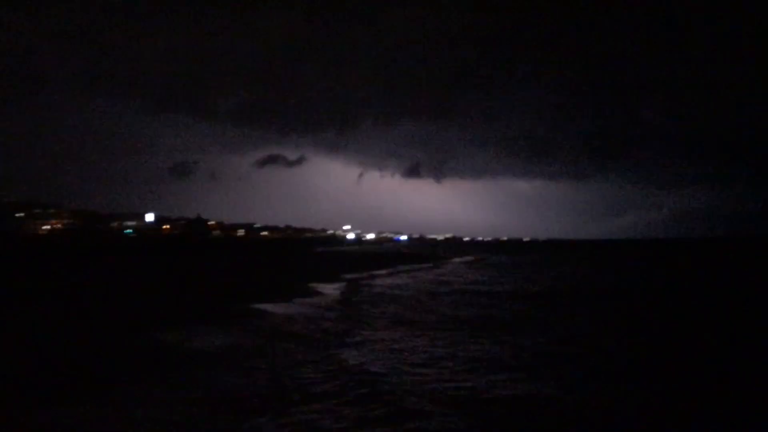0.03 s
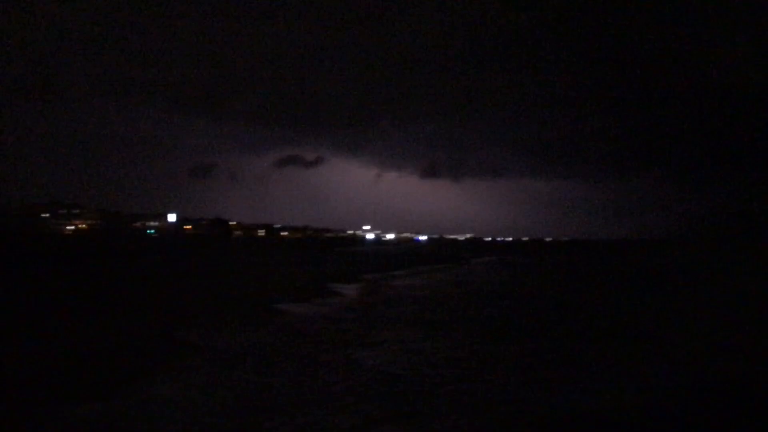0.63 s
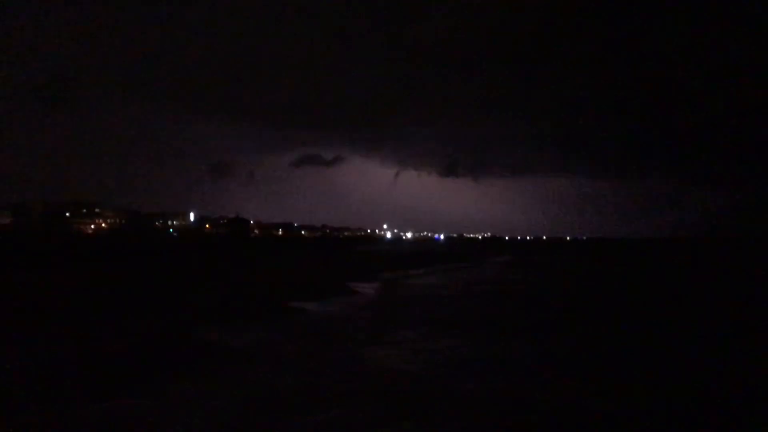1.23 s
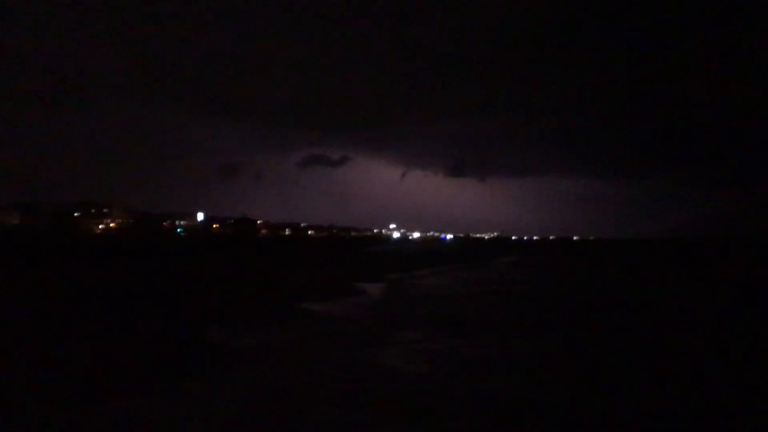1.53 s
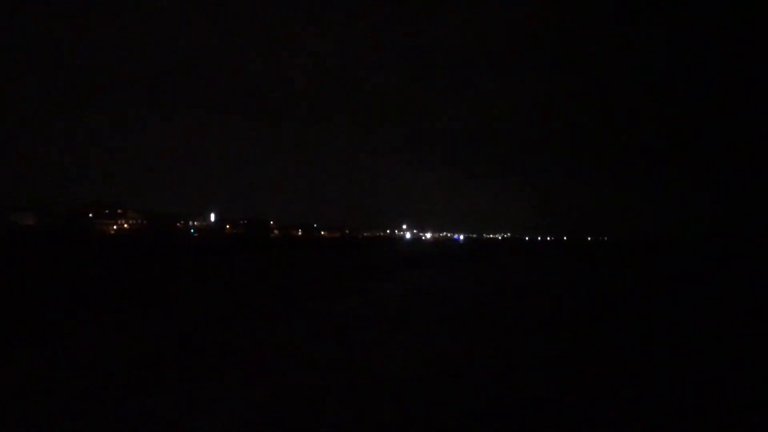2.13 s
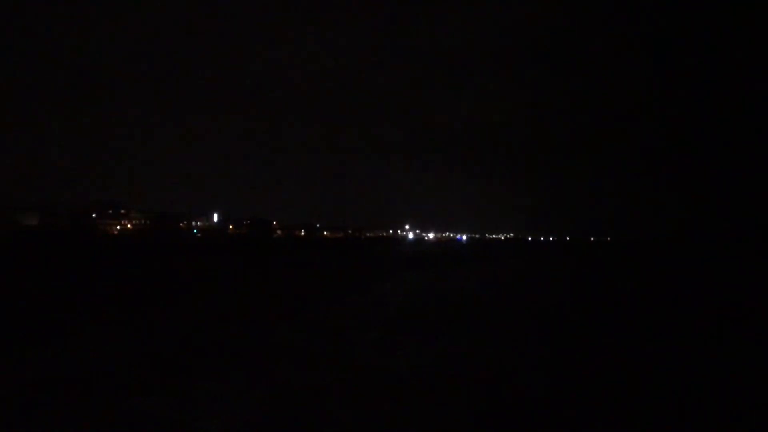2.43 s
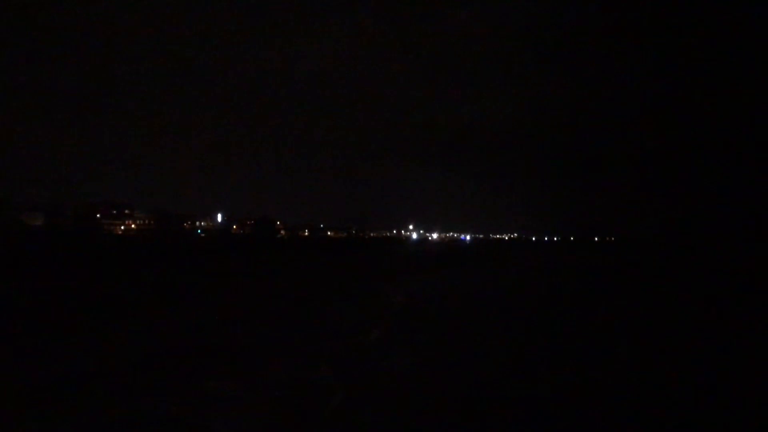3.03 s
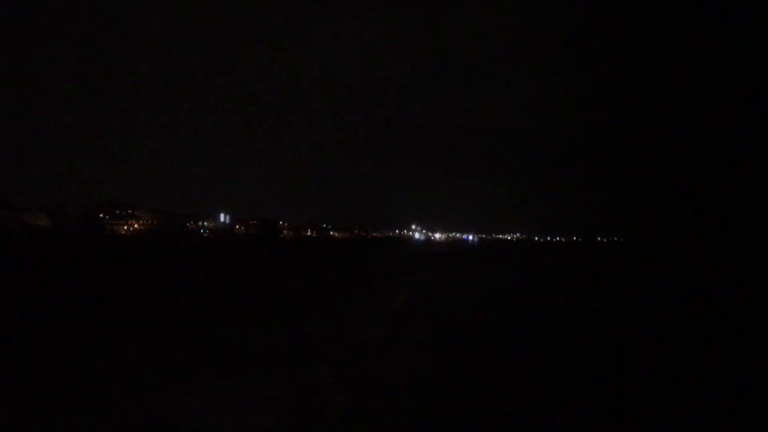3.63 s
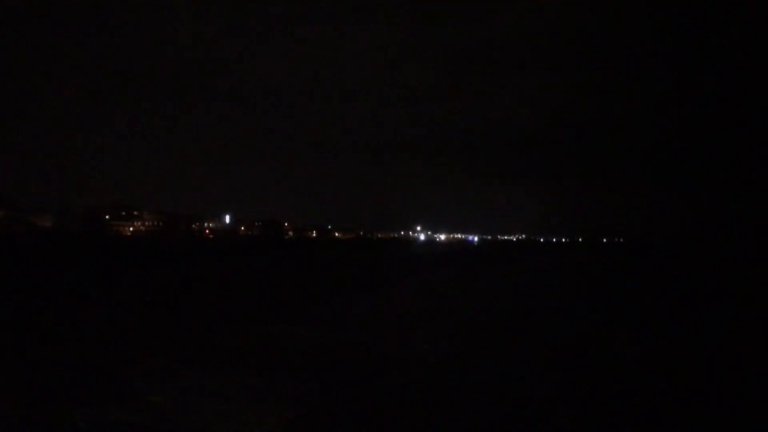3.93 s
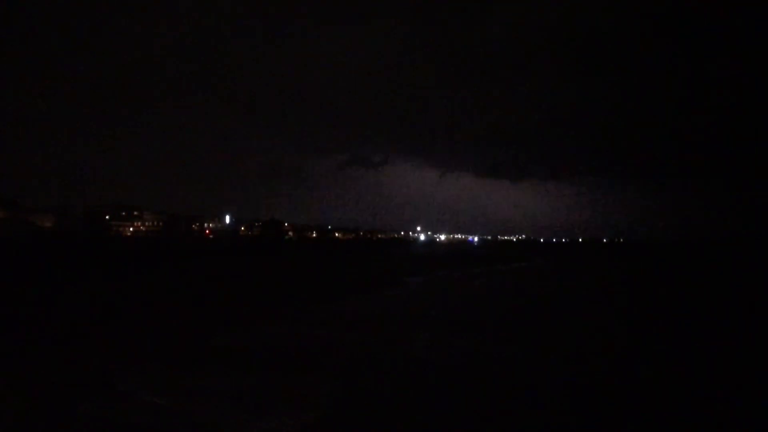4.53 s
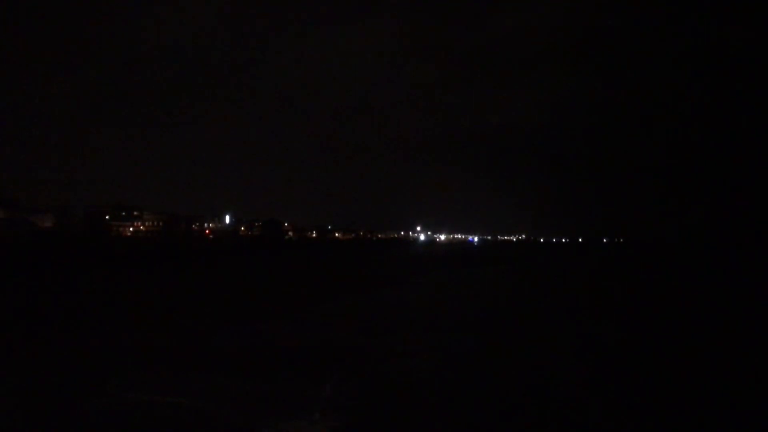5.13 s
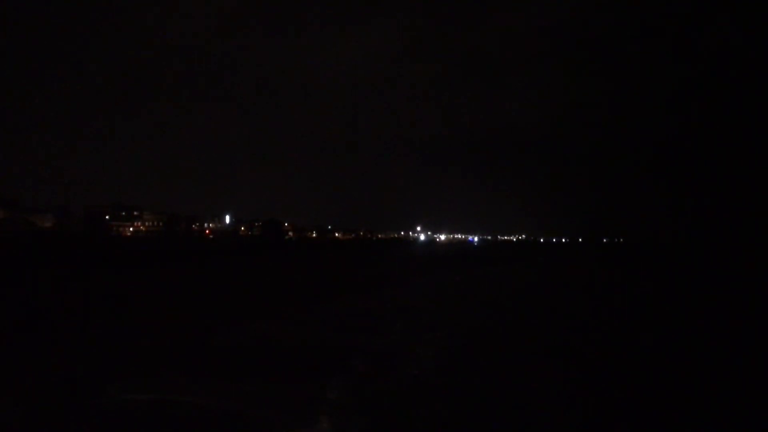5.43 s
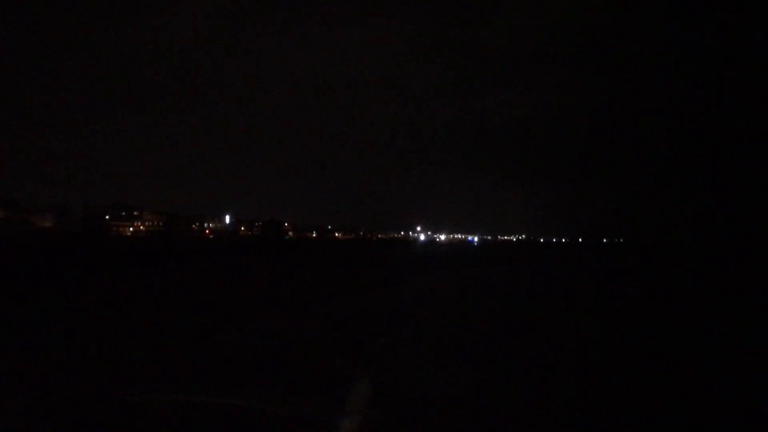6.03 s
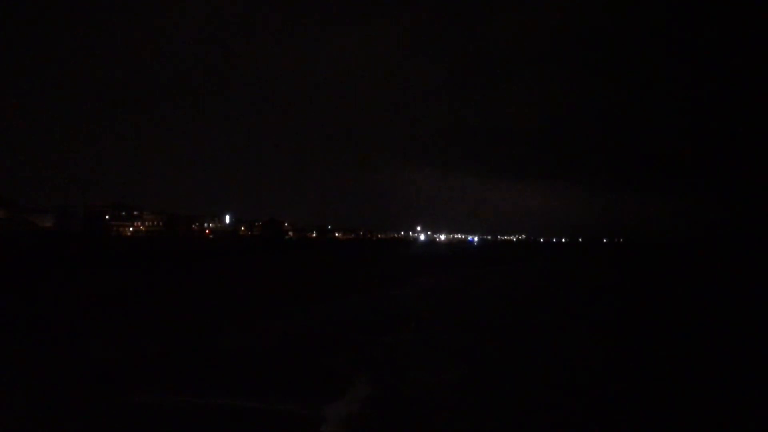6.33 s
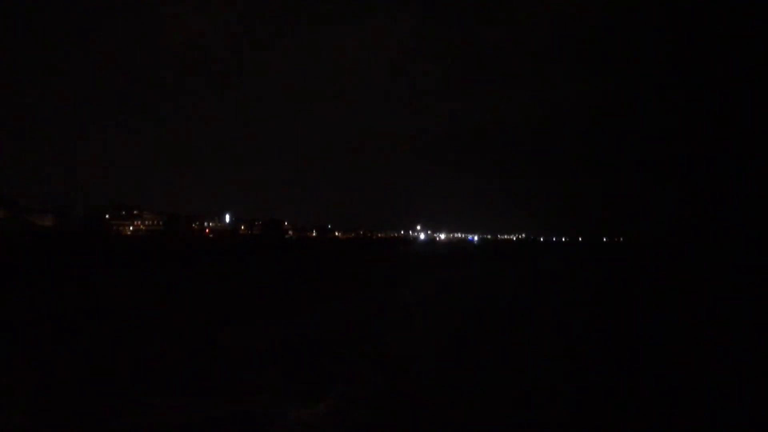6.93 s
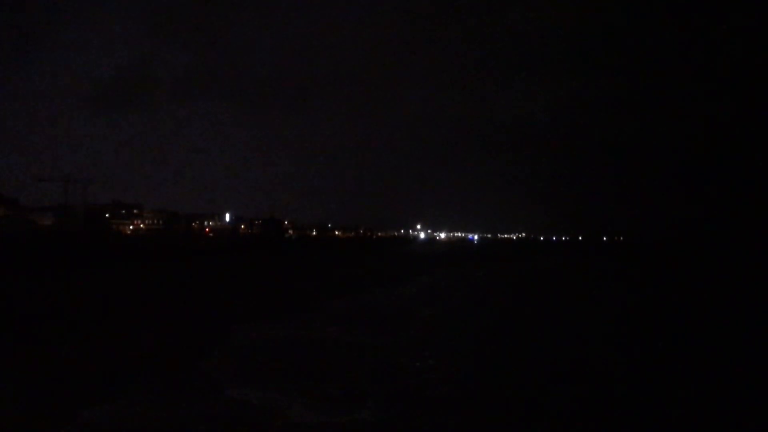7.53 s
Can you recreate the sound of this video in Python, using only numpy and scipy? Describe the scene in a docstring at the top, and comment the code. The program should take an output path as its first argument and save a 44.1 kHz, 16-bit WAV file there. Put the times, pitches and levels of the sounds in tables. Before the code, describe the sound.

Deep gusts of wind buffet the microphone from the start, loudest in the first half second, over a dull, muffled wash of distant surf. Around 0.7 seconds come three quick, hollow knocks on the microphone's case, and a few faint ticks follow up to about 3 seconds. Strong gusts thump again near 2.4 and 3.2 seconds. Between 3.5 and 4 seconds the wind eases and the sound opens up, becoming clear and bright. At about 4.5 seconds one wave breaks and runs up the beach, quieter than the gusts, with tumbling water, bubbles and hissing foam. Small drops of spray tick around 5.5 seconds and there is a soft gulp of water near 6.2. The wash swells near 6.8 seconds and then drains away, as the wind returns from 7 seconds, rumbling and buffeting until the end at about 8.

```python
"""A night shore in gusty wind. At first the sea is a muffled wash under deep buffeting of the microphone,
with a few knocks and faint ticks. Then the sound opens up: one wave breaks and runs up the beach,
and as it drains the wind catches the microphone again. Wind is low noise swelled by gusts;
the wave is noise in three bands (tumble, roar, foam hiss) with ringing air bubbles and spray."""
import sys
import numpy as np
from scipy import signal
from scipy.fft import rfft, irfft
from scipy.io import wavfile
from scipy.ndimage import uniform_filter1d

SR = 44100
rng = np.random.default_rng(int(sys.argv[2]) if len(sys.argv) > 2 else 0)


def master_out(mix):
    """Clip the mix to full scale and print it as 16-bit PCM to the path in sys.argv[1]."""
    frames = np.transpose(np.atleast_2d(mix))
    ceiling = np.clip(frames, -1, 1)
    pcm = np.round(ceiling * 32767).astype(np.int16)
    wavfile.write(sys.argv[1], SR, pcm)


N = 343098
TIME = np.arange(N) / SR


def amp(db):
    """Decibels to gain."""
    return 10 ** (np.asarray(db) / 20)


def unit_rms(x):
    """Scales to rms 1."""
    return x / np.sqrt(np.mean(x ** 2) + 1e-20)


def spectrum_gain(spectrum, hz):
    """Gain at hz, interpolated in dB over log frequency."""
    points_hz, db = np.transpose(spectrum)
    return amp(np.interp(np.log(hz + 1), np.log(points_hz + 1), db))


def add(mix, start_s, sound):
    """Mixes a sound in at start_s."""
    part = mix[max(round(start_s * SR), 0):][:len(sound)]
    part += sound[:len(part)]


def low_pass(x, hz):
    """Steep cut above hz."""
    return signal.oaconvolve(x, signal.firwin(1023, hz, window=("kaiser", 9), fs=SR), "same")


def noise(spectrum):
    """Steady shaped noise, rms 1."""
    gain = spectrum_gain(spectrum, np.fft.rfftfreq(N, 1 / SR))
    return unit_rms(irfft(rfft(rng.standard_normal(N)) * gain, N))


def turbulence(spectrum, span_samples):
    """Noise levelled over short spans, so the gusts alone shape it."""
    x = noise(spectrum)
    power = uniform_filter1d(uniform_filter1d(x ** 2, span_samples), span_samples)
    return unit_rms(x / np.sqrt(power + 0.024))


def patches(shape, frames, bins):
    """Smooth random time-frequency field, rms 1."""
    field = uniform_filter1d(rng.standard_normal(shape), frames, axis=0)
    return unit_rms(uniform_filter1d(field, bins, axis=1))


def bursts(rows, width_octaves):
    """Band-noise puffs: fast attack, slower decay."""
    out, hz = np.zeros(N), np.fft.rfftfreq(16384, 1 / SR)
    for start_s, rms_db, length_s, centre_hz in rows:
        band = np.exp(-.5 * (np.log2((hz + 1) / centre_hz) / width_octaves) ** 2)
        puff = irfft(rfft(rng.standard_normal(16384)) * band)[:int(length_s * SR)]
        u = np.linspace(0, 1, len(puff))
        add(out, start_s, amp(rms_db) * unit_rms(puff * np.sqrt(u) * (1 - u) ** 2))
    return out


def swells(rows, base_db, rise_share=0.47, drop_db=11, roundness=2.6):
    """Level in dB per part: base plus rounded swells, each length taken drop_db below its crest."""
    powers = [amp(db) ** 2 + np.zeros(N) for db in base_db]
    for crest_s, length_s, *crest_db in rows:
        near = abs(TIME - crest_s) < 2 * length_s
        u = (TIME[near] - crest_s) / length_s
        shape = amp(-drop_db * np.maximum(-u / rise_share, u / (1 - rise_share)) ** roundness)
        for power, db in zip(powers, crest_db):
            power[near] += (amp(db) * shape) ** 2
    return 10 * np.log10(powers)


# Distant surf: (time [s], level [dB])
FAR_SEA_LEVEL = [(0, -46), (1.6, -48), (2.7, -47.5), (3.4, -45)]
# Distant surf: (frequency [Hz], relative level [dB])
FAR_SEA_SPECTRUM = [(40, -2.5), (120, 6), (220, -1.5), (400, -4.5), (520, -7.5), (630, -9.5), (780, -11.5),
                    (1100, -15.5), (1300, -19), (1500, -17.5), (1900, -19.5), (2100, -27), (2300, -25.5)]
def far_sea(flicker_db=0.7):
    """Even, dull wash of surf along the shore."""
    level_db = np.interp(TIME, *np.transpose(FAR_SEA_LEVEL))
    flicker = unit_rms(uniform_filter1d(rng.standard_normal(N), 500))
    return amp(level_db + flicker_db * flicker) * noise(FAR_SEA_SPECTRUM)


# Spent foam: (frequency [Hz], relative level [dB])
FIZZ_SPECTRUM = [(500, -4.5), (3000, -2), (9000, 6), (15700, 5)]
def fizz(level_db=-61):
    """Fine, steady hiss of spent foam."""
    return amp(level_db) * noise(FIZZ_SPECTRUM)


# Ticks: (time [s], rms [dB], length [s], centre [Hz])
TICK_BURSTS = [(.801, -54, 0.029, 1340), (1.756, -52.5, 0.0066, 1030), (1.94, -56.5, 0.009, 1400),
               (2.81, -56, 0.013, 720), (3.244, -58.5, 0.0084, 1600)]
def ticks():
    """Faint midrange ticks."""
    return bursts(TICK_BURSTS, width_octaves=0.42)


# Knocks on the case: (time [s], level [dB], click gain [ratio])
CASE_KNOCKS = [(0.6645, -30, 0.07), (0.7568, -21.5, 0.17), (0.7785, -29, 0.16)]
# Case resonances: (frequency [Hz], gain [dB], t60 [s])
CASE_MODES = [(682, 5, 0.017), (543, -6, 0.023), (920, -16.5, 0.021)]
def knocks(click_hz=1800, click_decay_s=0.0014, attack_s=0.0017):
    """A click and the brief, hollow ring of the camera's case."""
    out, t = np.zeros(N), np.arange(SR // 10) / SR
    ring = sum(amp(db - 60 * t / t60_s) * np.sin(2 * np.pi * hz * t) for hz, db, t60_s in CASE_MODES)
    ring *= 1 - np.exp(-t / attack_s)
    click = np.sin(2 * np.pi * click_hz * t) * np.exp(-t / click_decay_s)
    for start_s, level_db, click_gain in CASE_KNOCKS:
        add(out, start_s, amp(level_db) * (ring + click_gain * click))
    return out


# Flurries: (time [s], rms [dB], length [s], centre [Hz])
FLURRY_BURSTS = [(4.76, -38, 0.04, 288), (5.33, -40.5, 0.029, 242), (7.147, -39.5, 0.018, 317),
                 (7.467, -37.5, 0.097, 400)]
def flurries():
    """Bursts of rougher air or slapping water."""
    return bursts(FLURRY_BURSTS, width_octaves=0.57)


# Gusts on the microphone: (crest time [s], length [s], swings [dB], eddies [dB])
WIND_GUSTS = [(.02, 0.084, -31.5, -14), (.13, 0.27, -13.5, -32), (.27, 0.16, -17.5, -25),
              (.38, 0.12, -20, -22.5), (.52, 0.15, -16, -30), (.635, 0.1, -23, -17.5),
              (.76, 0.21, -22.5, -24.5), (1.01, 0.17, -26.5, -30), (1.12, 0.062, -29, -27),
              (1.24, 0.24, -25.5, -44.5), (1.41, 0.24, -23, -35.5), (1.68, 0.25, -26.5, -59),
              (1.83, 0.12, -32.5, -49), (2.285, .06, -31, -42), (2.385, 0.11, -15, -31.5),
              (2.48, .13, -21, -36.5), (2.62, 0.15, -22, -40), (3.09, 0.09, -21, -42),
              (3.2, 0.31, -19, -40), (3.48, 0.34, -39.5, -61), (3.86, .16, -41, -58),
              (4.09, 0.34, -42, -69), (4.6, 0.14, -39, -55), (4.77, 0.21, -41.5, -47.5),
              (4.98, 0.15, -46, -43.5), (5.23, 0.34, -38, -58), (6.1, 0.32, -42, -69),
              (6.42, 0.12, -56, -40.5), (7.02, 0.17, -38.5, -43), (7.15, 0.15, -31, -39),
              (7.26, 0.2, -30.5, -41.5), (7.47, 0.33, -28.5, -37.5), (7.76, 0.34, -32, -39.5)]
def gusts(swings, eddies, lull_db):
    """Gusts lift the deep swings and faster eddies above their lull levels."""
    swing_db, eddy_db = swells(WIND_GUSTS, lull_db)
    return amp(swing_db) * swings + amp(eddy_db) * eddies


# Light wind: (frequency [Hz], relative level [dB])
BREEZE_SPECTRUM = [(15, -11), (40, -3), (65, 6.5), (100, 1.5), (140, -3.5), (210, -6.5), (300, -16.5),
                   (600, -26.5), (2000, -74)]
def breeze(split_hz=135):
    """Lighter wind that flutters under the wave and rises after it."""
    air = turbulence(BREEZE_SPECTRUM, span_samples=2400)
    deep = low_pass(air, split_hz)
    return gusts(unit_rms(deep), unit_rms(air - deep), lull_db=(-49.5, -52.5))


# Pressure swings: (frequency [Hz], relative level [dB])
SWING_SPECTRUM = [(5, 4), (12, 5), (24, 2.5), (50, -11), (75, -32.5), (130, -48.5), (400, -78)]
# Eddies: (frequency [Hz], relative level [dB])
EDDY_SPECTRUM = [(30, -8), (60, 1.5), (85, 3), (125, -10.5), (170, -17.5), (250, -34), (500, -63.5),
                 (1500, -92.5)]
def deep_wind():
    """Slow pressure swings and faster eddies on the microphone."""
    swings = turbulence(SWING_SPECTRUM, span_samples=4000)
    eddies = turbulence(EDDY_SPECTRUM, span_samples=1500)
    return gusts(swings, eddies, lull_db=(-34.5, -55))


# Hardest single eddies on the microphone: (time [s], peak [dB], half length [s])
EDDY_HITS = [(.017, -15.5, .002), (0.38, -14, 0.0027), (0.639, -10, 0.0029), (0.712, -14, 0.0031),
             (0.823, -20.5, 0.0046), (2.383, -11, 0.0088), (3.218, -19, 0.0041), (7.268, -18.5, 0.0028),
             (7.418, -25, 0.0018), (7.476, -14.5, 0.0014)]
def buffets():
    """Each passing eddy is a pressure dip between two shallow crests."""
    out = np.zeros(N)
    for centre_s, peak_db, half_s in EDDY_HITS:
        u = (TIME - centre_s) / half_s
        near = abs(u) < 7
        out[near] -= amp(peak_db) * (1 - u[near] ** 2) * np.exp(-u[near] ** 2 / 2)
    return out


# Spray: (time [s], rms [dB], length [s], centre [Hz])
SPRAY_BURSTS = [(5.329, -50, .005, 13000), (5.399, -50, .006, 9000), (5.54, -44, 0.0041, 10000),
                (5.591, -52, .005, 8500), (6.72, -60, 0.084, 5500), (7.218, -60.5, .006, 12500)]
def spray():
    """Bright spray, as single drops or a whole sheet."""
    return bursts(SPRAY_BURSTS, width_octaves=0.59)


# Air pocket: (time [s], rms [dB], length [s], centre [Hz])
GULP_BURST = [(6.235, -44, 0.13, 362)]
def gulp():
    """A large air pocket gulps in the surf."""
    return bursts(GULP_BURST, width_octaves=0.13)


# Rows for tumble, roar, foam: (run-up level [dB], slope against wave strength [dB/dB])
SURGE_PARTS = [(-45, 0.88), (-43, 0.78), (-48.5, 1)]
# Crests spilling in the run-up: (crest time [s], length [s], tumble [dB], roar [dB], foam [dB])
SPILLING_CRESTS = [(4.92, 0.23, -43, -52, -58), (5.72, 0.28, -44, -46, -51),
                   (6.36, 0.51, -45.5, -49.5, -53), (6.77, 0.17, -42.5, -45.5, -46)]
def surge(break_s=4.508, build_s=0.25, run_up_s=2.135, ebb_s=0.31, calm_db=-7, drained_db=-9.5):
    """Tumble, roar and foam levels in dB as the wave breaks, runs up and drains."""
    stages_s = np.cumsum([break_s, build_s, run_up_s, ebb_s])
    strength_db = np.interp(TIME, stages_s, [calm_db, 0, 0, drained_db])
    return swells(SPILLING_CRESTS, [db + slope * strength_db for db, slope in SURGE_PARTS])


def bubbles(relative_db=-12, sizes=36, per_size_per_s=9, decay_cycles=9, spread_db=3.5, glide=0.019):
    """Trapped air pockets ring briefly, rising in pitch; their level follows the roar."""
    out, t = np.zeros(N), np.arange(SR // 8) / SR
    for hz in np.geomspace(330, 3200, sizes):
        age = t * hz / decay_cycles
        envelope = (1 - np.exp(-10 * age)) * np.exp(-age)
        ring = envelope * np.sin(2 * np.pi * decay_cycles * age * (1 + glide * age))
        births = np.zeros(N)
        onsets = rng.integers(0, N, int(per_size_per_s * N / SR))
        births[onsets] = amp(spread_db * np.minimum(rng.exponential(1, len(onsets)), 4))
        out += signal.oaconvolve(births, ring)[:N]
    _, roar_db, _ = surge()
    return amp(roar_db + relative_db) * unit_rms(out)


# Breaking wave: (frequency [Hz], relative level [dB])
WAVE_SPECTRUM = [(30, -45), (100, -14), (200, -7.5), (380, -4.5), (520, -5.5), (950, -1), (1350, -4.5),
                 (1700, -8.5), (2200, -9.5), (4200, -14), (6500, -18), (9000, -22), (12500, -26.5),
                 (15700, -29)]
def wave(clump_db=1.25, fizz_db=1.1, flicker_db=0.54):
    """Water tumbles low, roars in the middle and hisses as foam; splashes make it patchy."""
    hz, frame_s, white = signal.stft(rng.standard_normal(N), SR, nperseg=512, noverlap=384)
    colour = spectrum_gain(WAVE_SPECTRUM, hz)
    field_db = np.zeros((len(frame_s), len(hz)))
    bands_hz, centres_hz = [(250, 600), (650, 2000), (3000, 15000)], [420, 1050, 4200]
    for level_db, (low_hz, high_hz), own_band in zip(surge(), bands_hz, np.eye(3)):
        band_power = np.mean(colour ** 2 * (hz > low_hz) * (hz < high_hz))
        gain_db = np.interp(frame_s, TIME, level_db) - 10 * np.log10(band_power)
        blend = np.interp(np.log(hz + 1), np.log(centres_hz), own_band)
        field_db += np.outer(gain_db, blend)
    # Big cavities clump; small bubbles are smoother.
    coarse = 1 / (1 + (hz / 1800) ** 2)
    field_db += clump_db * coarse * patches(field_db.shape, frames=12, bins=4)
    field_db += fizz_db * (1 - coarse) * patches(field_db.shape, frames=3, bins=12)
    field_db += flicker_db * patches(field_db.shape, frames=10, bins=200)
    _, water = signal.istft(white * (colour * amp(field_db)).T, SR, nperseg=512, noverlap=384)
    return water[:N]


def scene(fade_start_s=3.54, fade_end_s=4.04, muffle_hz=2320):
    """The muffled shore fades into the open one."""
    opening = np.clip((TIME - fade_start_s) / (fade_end_s - fade_start_s), 0, 1)
    muffled = low_pass(deep_wind() + far_sea() + knocks() + ticks(), muffle_hz)
    water = wave() + bubbles() + fizz() + spray() + gulp()
    shore = water + breeze() + flurries()
    return (muffled * (1 - opening) + shore * opening + buffets())[None]


# Microphone response dips: (centre [Hz], width [Hz], depth [dB])
TREBLE_DIPS = [(4890, 135, 4.3), (7700, 300, 3.2), (10480, 250, 5.5)]
def record(dry, limit_hz=15750):
    """The microphone's treble dips, then the band limit."""
    hz = np.fft.rfftfreq(N, 1 / SR)
    dips_db = sum(depth_db * np.exp(-.5 * ((hz - centre_hz) / width_hz) ** 2)
                  for centre_hz, width_hz, depth_db in TREBLE_DIPS)
    dipped = irfft(rfft(dry[0]) * amp(-dips_db), N)
    return low_pass(dipped, limit_hz)[None]


dry = scene()
out = record(dry)
master_out(out)
```